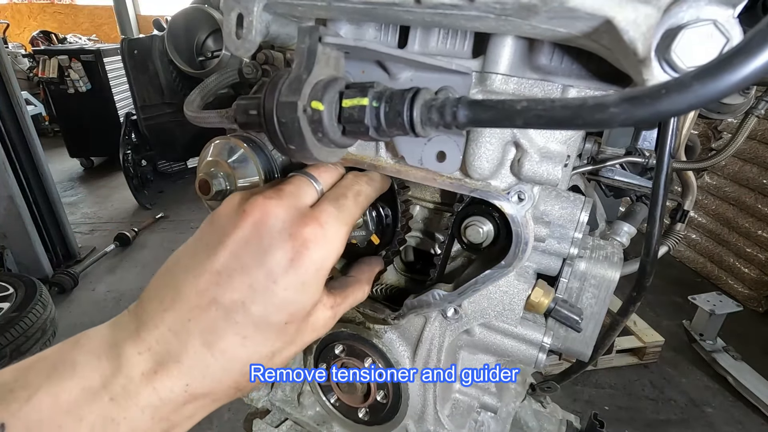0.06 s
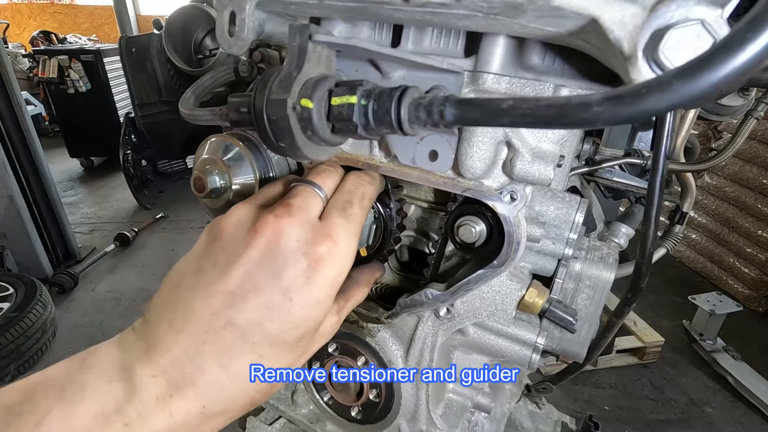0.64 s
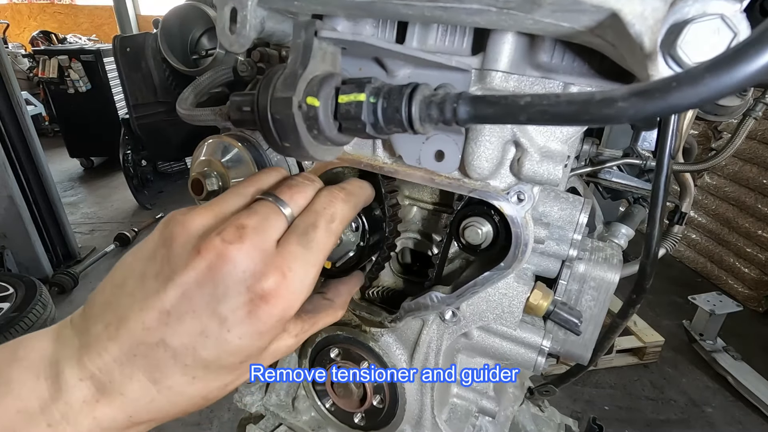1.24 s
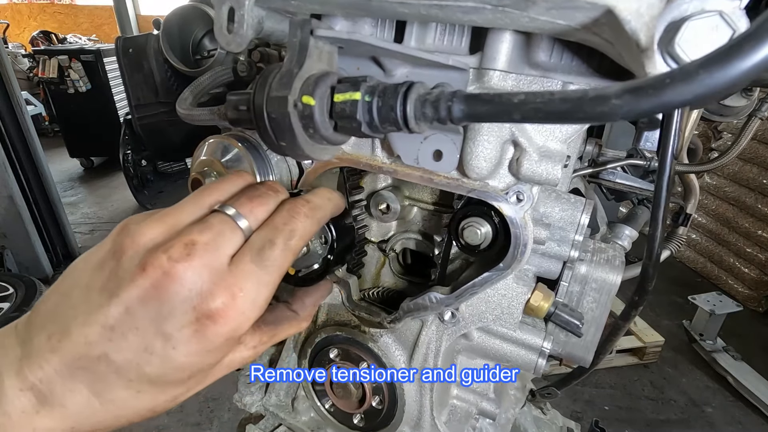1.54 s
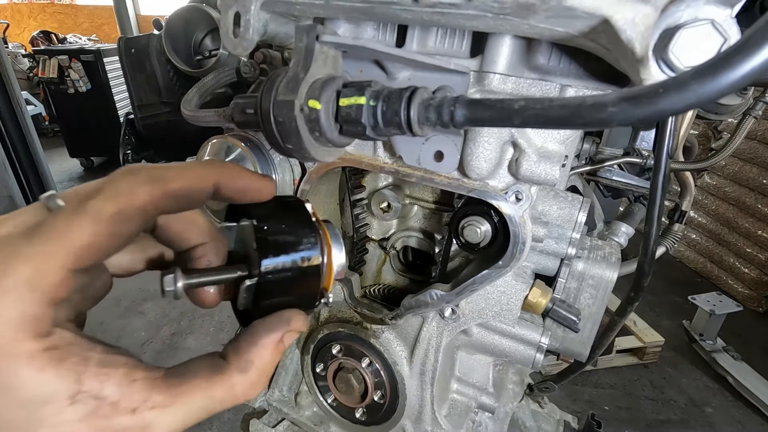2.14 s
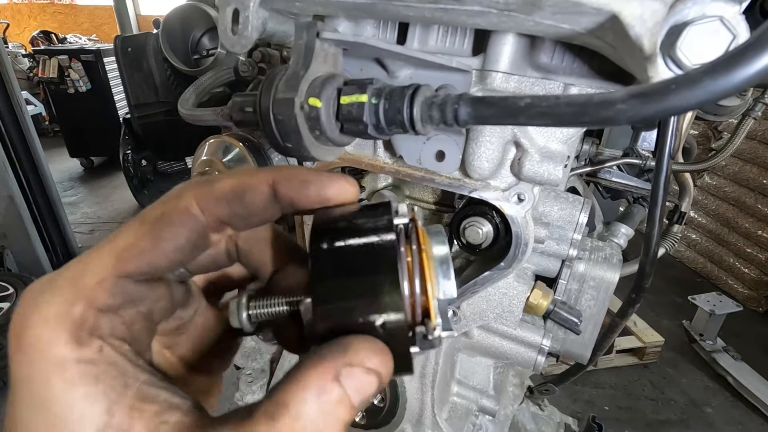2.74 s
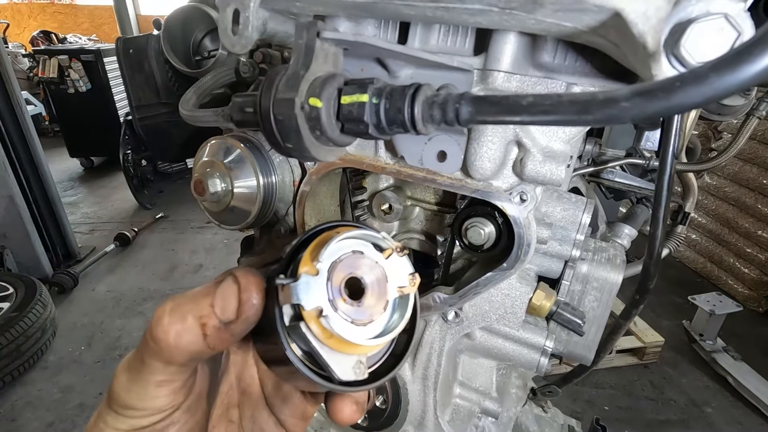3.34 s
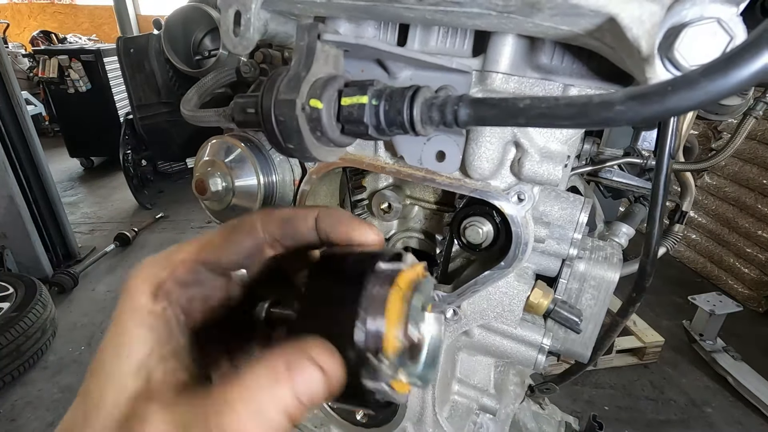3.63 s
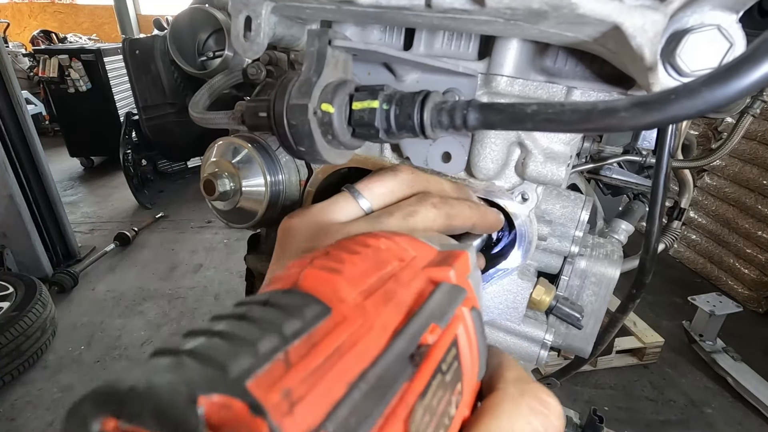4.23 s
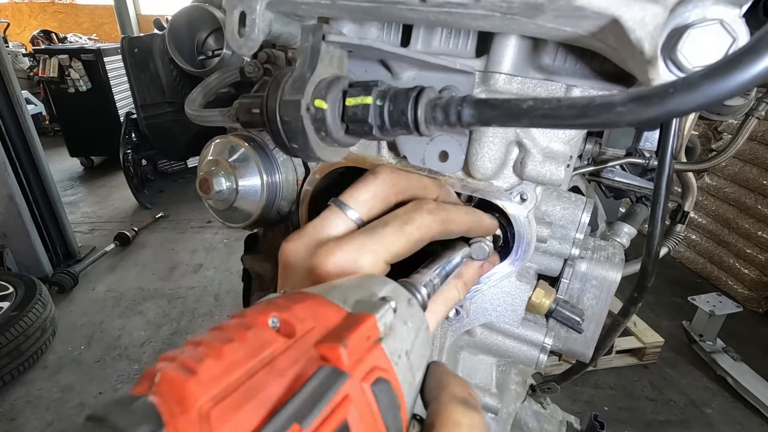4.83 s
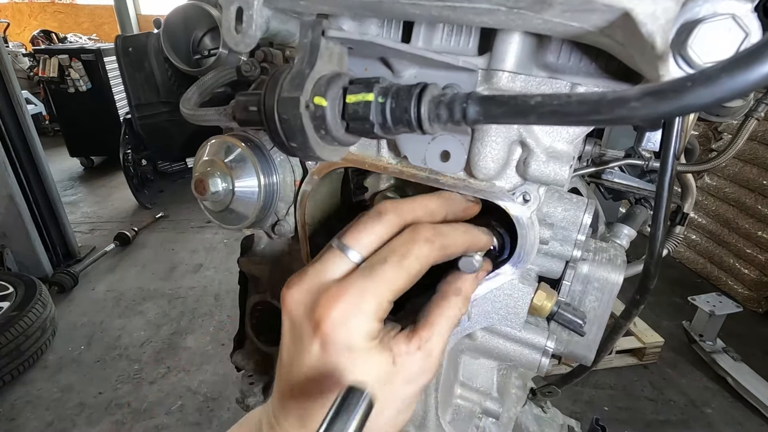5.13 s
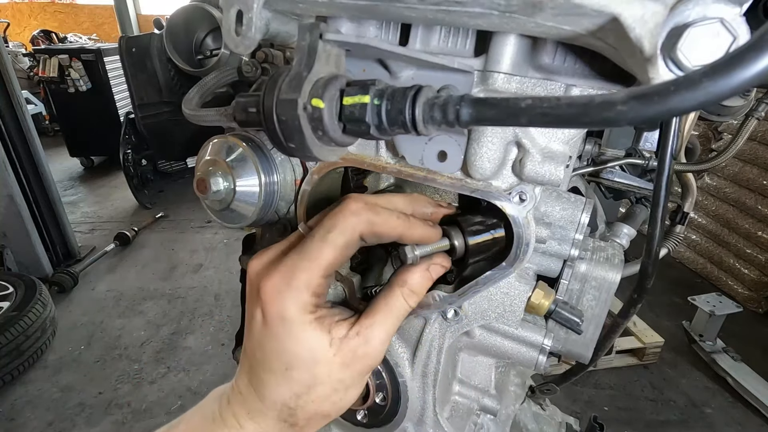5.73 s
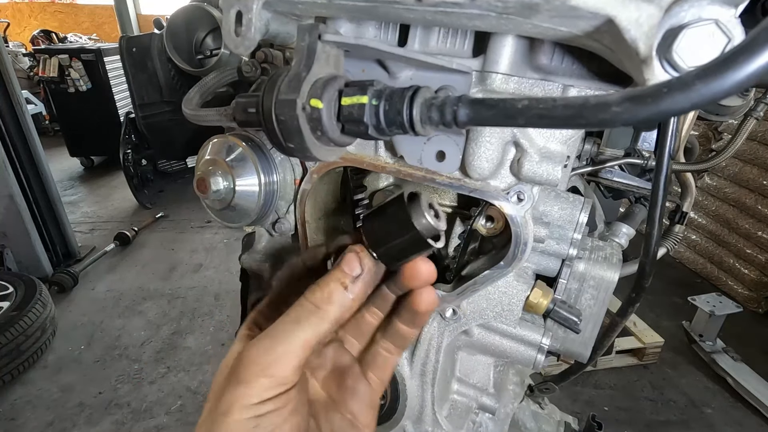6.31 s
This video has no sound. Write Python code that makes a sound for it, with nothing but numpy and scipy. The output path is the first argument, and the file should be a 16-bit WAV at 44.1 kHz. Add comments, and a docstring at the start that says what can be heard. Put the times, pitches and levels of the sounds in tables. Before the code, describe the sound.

Close to an engine in a garage, a steel part is worked loose with scattered small knocks, ringing clinks and faint scrapes. A socket clacks onto a bolt, and a much louder cordless impact wrench hammers for a moment, spins with a gear whine, then brakes. A couple of faint clinks follow. A low rumble and soft workshop hiss lie behind it all.

```python
"""A garage, with a stereo pair of microphones close to an engine block.
A steel tensioner is worked out of the block with small knocks, clinks and scrapes. Then, a little to the
right, a cordless impact wrench hammers a bolt loose, spins it out with whining gears, and brakes.
Behind lie a low rumble and soft workshop noise; the recorder's gain control ducks under the wrench
and lets them back up slowly."""
import sys
import numpy as np
from scipy import signal
from scipy.fft import rfft, irfft
from scipy.io import wavfile
from scipy.ndimage import uniform_filter1d

SR = 44100
rng = np.random.default_rng(int(sys.argv[2]) if len(sys.argv) > 2 else 0)


def file_out(sig):
    """Save sig as 16-bit WAV at sys.argv[1]."""
    # one column per channel
    cols = np.atleast_2d(sig).T
    # limit, then scale
    lim = np.clip(cols, -1, 1)
    pcm = np.round(lim * 32767).astype(np.int16)
    wavfile.write(sys.argv[1], SR, pcm)


N = 285327
TIME = np.arange(N) / SR

# Levels are relative, ahead of the mix and the gain control; spectra are per Hz.
# spectra of the rumble, the workshop noise, the hiss and a clatter further off: f/Hz, level/dB
RUMBLE_SPECTRUM = [(20, 3), (45, -0.5), (80, -6), (120, -12), (210, -14.5), (300, -23), (430, -35.5),
                   (2000, -100)]
SHOP_SPECTRUM = [(200, -10), (420, 4.5), (800, -3.5), (1200, 0.5), (2000, -8), (3200, -20.5), (12000, -66)]
HISS_SPECTRUM = [(800, -17), (2200, 1), (5200, 2), (7500, -8.5), (9500, -16), (13000, -22), (15500, -47.5)]
CLATTER_SPECTRUM = [(330, -20), (440, -4.5), (560, -15), (1000, -15), (1500, -24.5), (12000, -58)]
# slow drift of the first three: t/s, level/dB
RUMBLE_LEVEL = [(0, -41), (.6, -35.5), (1.5, -40.5), (6.47, -39)]
SHOP_LEVEL = [(0, -62.5), (1, -66.5), (3.5, -64), (6.47, -58.5)]
HISS_LEVEL = [(0, -72.5), (.8, -72.5), (2.6, -64.5), (3.5, -68.5), (6.47, -68.5)]
# steel knocking on steel, close up: t/s, part, peak level/dB, brightness/(dB per octave), main note/Hz
KNOCKS = [(0.046, "bolt", -44, 7, 7140), (0.41, "block", -22, -2.5, 633), (0.508, "bolt", -35, 2.5, 2900),
          (0.54, "bolt", -35, 5.5, 3700), (0.554, "block", -34, -8, 620), (0.581, "block", -37, -10, 617),
          (0.674, "block", -41, -26, 537), (0.845, "bolt", -46, -3.5, 7550),
          (0.881, "bolt", -42, -2.5, 3900), (0.897, "bolt", -40.5, -2.5, 2680),
          (1.227, "tensioner", -17, -2, 2247), (1.456, "plunger", -37.5, 0.5, 1870),
          (1.471, "block", -33.5, 0, 656), (1.54, "bolt", -29, -8, 1610), (1.554, "bolt", -41, -11, 1600),
          (1.609, "block", -24, -5, 1497), (1.795, "block", -35.5, -6, 1560),
          (2.079, "plunger", -36, 2, 5340), (2.098, "plunger", -23, 1, 4400),
          (2.116, "plunger", -29.5, 4, 2300), (2.268, "block", -33.5, -8, 665),
          (2.917, "block", -33, -0.5, 592), (3.719, "socket", -31.5, -3, 876),
          (3.826, "socket", -36, 0, 1510), (3.843, "socket", -29.5, -3, 1430),
          (3.861, "socket", -15.5, 2, 559), (3.873, "block", -29.5, -8.5, 558),
          (3.914, "socket", -29, -19, 1601), (5.619, "bolt", -35, 0, 2290),
          (6.326, "block", -41, -5.5, 606)]
# how each part rings: ring level/dB, t60/s, hollow body/dB, modes as (f/Hz, level/dB)
STEEL_PARTS = { "block": (-15, .1, -1, [(600, 1), (1090, 0), (1480, 4), (1760, 4), (6200, 0)]),
               "bolt": (-16, 0.24, -4, [(2720, 0), (3700, -11), (7100, 2), (7600, -4.5)]),
               "tensioner": (-10.5, 0.2, -1, [(802, 3), (1001, 5.5), (2230, 0), (3240, 2), (4310, 9),
               (4470, -9), (5529, -3), (7700, -5), (9300, 2)]), "plunger": (-12.5, .35, -28, [(2003, -5),
               (3074, -17), (3752, -14), (4301, -8), (4770, -14), (6900, -1.5), (9265, -4.5)]),
               "socket": (-17, 0.057, 0, [(560, 2.5), (4250, 1.5), (8150, 0.5), (9400, 3), (10100, 6)]), }
# spectrum of a steel contact: f/Hz, level/dB
CONTACT_SPECTRUM = [(100, -17), (370, -1.5), (600, 2), (1600, -4), (3700, -3), (8000, -12.5), (15500, -31)]
# parts sliding: t/s, length/s, level/dB, squeak/Hz
SCRAPES = [(0.262, 0.11, -55, 4570), (1.211, 0.016, -43, 2270), (2.068, 0.037, -46.5, 5500),
           (2.905, .17, -57.5, 2830), (3.721, 0.11, -53, 2192), (3.87, 0.077, -45.5, 2432),
           (6.15, 0.092, -60.5, 4870)]
# tones of rotor and fan, gear mesh with sidebands, and braking motor: multiple of shaft speed, level/dB
ROTOR_TONES = [(1, -50), (4, -38), (8, -45), (13, -28), (16, -40.5), (26, -50)]
GEAR_TONES = [(5.885, -41), (6.02, -39.5), (6.262, -33), (12.165, -35.5), (12.53, -35), (12.88, -45),
              (18.05, -42)]
BRAKE_TONES = [(4, -1.5), (8, -5), (20, -15.5)]
# spectra of the wrench's gear case and anvil: f/Hz, level/dB
CASE_SPECTRUM = [(100, -14), (450, -14), (800, -10.5), (1000, -6.5), (1600, -1), (2250, -0.5), (2950, -3.5),
                 (3400, -1), (3750, -6), (5000, -8.5), (6100, -6), (7500, -11.5), (10700, -15),
                 (13500, -22.5), (14800, -46.5)]
ANVIL_SPECTRUM = [(88, -35.5), (150, 5.5), (229, -5), (425, -14), (1670, -4.5), (3820, -7.5), (4210, -6.5),
                  (8750, -18.5), (11000, -13.5), (12900, -25), (15000, -48.5)]
# the socket clacks on, then the hammer strikes: t/s, crack level/dB, thump level/dB, crack length/s
BLOWS = [(4.0174, -7, -40, .001), (4.0495, -6, -22, .002), (4.055, 1, -19, .0012), (4.0608, -1, -13, .0012),
         (4.0942, -4, -22, .002), (4.0968, -3, -14, .002), (4.1142, -4, -22, .002),
         (4.1172, -3, -18, .0014), (4.1342, -2, -13, .003), (4.152, -3.5, -13, .003),
         (4.1712, -4, -19, .002)]
# the garage's reverberation: f/Hz, t60/s
GARAGE_T60 = [(150, 0.87), (700, 0.66), (1800, 0.68), (4600, 0.65), (8000, .45), (14000, 0.023)]

# one run of the wrench: trigger pulled, bolt comes loose, brake bites, rattle dies
START_S, LOOSE_S, BRAKE_S, STOP_S = 4.0, 4.17, 4.764, 4.842
FULL_SPEED_HZ = 335


def amp(db):
    """Decibels to gain."""
    return 10 ** (np.asarray(db) / 20)


def unit(x):
    """Scales to rms 1."""
    return x / np.sqrt(np.mean(x ** 2) + 1e-20)


def read(points, hz):
    """Reads rows of (f/Hz, value) on a log-frequency axis."""
    f, value = np.transpose(points)
    return np.interp(np.log(hz + 1), np.log(f + 1), value)


def curve(rows):
    """Joins rows of (t/s, value) by straight lines."""
    return np.interp(TIME, *np.transpose(rows))


def envelope(start, attack, end, release):
    """Rises in a straight line, holds until end, then dies away; all in seconds."""
    return np.clip((TIME - start) / attack, 0, 1) * np.exp(-np.maximum(TIME - end, 0) / release)


def add(mix, s, sound):
    """Mixes a sound in at time s."""
    span = mix[max(round(s * SR), 0):][:len(sound)]
    span += sound[:len(span)]


def colour(x, spectrum, size=4096):
    """Causal filter through rows of (f/Hz, level/dB)."""
    log_gain = np.log(amp(read(spectrum, abs(np.fft.fftfreq(size, 1 / SR)))))
    taps = np.fft.ifft(np.exp(np.conj(signal.hilbert(log_gain)))).real
    return signal.fftconvolve(x, taps[:size // 2])[:len(x)]


def burst(t, spectrum):
    """Coloured noise of rms 1, as long as t."""
    return unit(colour(rng.standard_normal(len(t)), spectrum))


def resonance(x, hz, q=5, gain_db=3):
    """Lifts a band around hz by adding a band-passed copy at gain_db."""
    return x + amp(gain_db) * signal.lfilter(*signal.iirpeak(hz, q, fs=SR), x)


def wander(hz):
    """Slow random motion of rms 1, up to about hz."""
    f = np.fft.rfftfreq(N, 1 / SR)
    return unit(irfft(rfft(rng.standard_normal(N)) / (1 + (f / hz) ** 4), N))


def air(spectrum, level_db, likeness):
    """Noise of one colour on a level curve; likeness 1 is the same at both microphones."""
    left, other = rfft(rng.standard_normal((2, N)))
    right = likeness * left + np.sqrt(1 - likeness ** 2) * other
    pair = np.array([left, right]) * amp(read(spectrum, np.fft.rfftfreq(N, 1 / SR)))
    return unit(irfft(pair, N)) * amp(level_db)


def workshop():
    """Low rumble, dull workshop noise, soft hiss and, at the start, a clatter dying away further off."""
    rumble = air(RUMBLE_SPECTRUM, curve(RUMBLE_LEVEL), likeness=1)
    shop = air(SHOP_SPECTRUM, curve(SHOP_LEVEL), likeness=.8)
    hiss = air(HISS_SPECTRUM, curve(HISS_LEVEL), likeness=.8)
    clatter = air(CLATTER_SPECTRUM, -43 - 85 * TIME, likeness=1)
    return rumble + shop + hiss + clatter


def contact_colour(brightness, hollow_db):
    """Hard contacts brighten the treble of a knock, heavy ones fill its bass."""
    hz, db = np.transpose(CONTACT_SPECTRUM)
    octaves = np.clip(np.log2(hz / 1600), 0, 2.3)
    return np.transpose([hz, db + brightness * octaves + hollow_db * (hz < 1000)])


def knocks(lead_s=.012, graze_s=.0025, contact_s=.0042, shudder_s=.08):
    """Parts graze and meet: a gritty contact, a shudder of the casting, and the struck part's ring."""
    t, out = np.arange(round(.4 * SR)) / SR - lead_s, np.zeros(N)
    after = np.maximum(t, 0)
    for s, part, peak_db, brightness, main_hz in KNOCKS:
        ring_db, t60, hollow_db, modes = STEEL_PARTS[part]
        grit, body = rng.standard_normal((2, len(t)))
        touch = grit * np.exp(np.minimum((t - .002) / graze_s, (.002 - t) / contact_s))
        shudder = amp(-20) * body * (t > 0) * np.exp(-after / shudder_s)
        blow, ring = resonance(touch + shudder, main_hz), 0
        for hz, db in modes:
            blow = resonance(blow, hz, q=16, gain_db=db)
            cluster_hz = hz * rng.normal(1, .018, (4, 1))  # a part's loose pieces split each mode
            ring += amp(db - 60 * after / t60) * np.sin(2 * np.pi * cluster_hz * after).sum(axis=0)
        note_t60 = .24 / (main_hz / 1000) ** .3  # low notes ring longer
        note = np.sin(2 * np.pi * main_hz * after) * amp(-60 * after / note_t60)
        ringing = amp(ring_db) * (unit(ring) + amp(-7) * unit(note))
        knock = colour(unit(blow) + ringing, contact_colour(brightness, hollow_db))
        peak_rms = np.sqrt(uniform_filter1d(knock ** 2, size=130).max())
        add(out, s - lead_s, amp(peak_db - 8) * knock / peak_rms)
    return out


def scrapes():
    """Oily steel slides with a thin, grainy squeak."""
    out = np.zeros(N)
    for s, length, db, hz in SCRAPES:
        count = round(length * SR)
        grains = rng.standard_normal(count) * rng.exponential(1, count)
        squeak = [(1800, -3), (hz * .85, -9), (hz, 3), (hz * 1.15, -9), (8000, -17), (15000, -36)]
        add(out, s, amp(db) * unit(colour(grains, squeak)) * signal.windows.hann(count) ** .5)
    return out


def trigger(jolt_s=.0055, whistle_hz=7980, fall_hz_per_s=5500):
    """The first current jolts the rotor; the speed controller whistles until the motor picks up."""
    t, out = np.arange(round(.06 * SR)) / SR, np.zeros(N)
    jolt = burst(t, [(600, -30), (1800, -11), (2700, 4), (3500, -7), (8500, -11), (14000, -45)])
    add(out, START_S, amp(-18) * jolt / (1 + (t / jolt_s) ** 8))
    whistle = np.sqrt(2) * np.sin(2 * np.pi * np.cumsum(whistle_hz - fall_hz_per_s * t) / SR)
    fade = np.exp(-t / .045) * signal.windows.tukey(len(t), .1)
    add(out, START_S + .0028, amp(-27) * whistle * fade)
    return out


def shaft_speed(loaded_hz=240, spin_up_s=.035, drag_hz=8, unscrew_s=.37, sag_hz=25, brake_hz_per_s=2450):
    """Turns a second: up against the tight bolt, on to full speed once it gives, then eased and braked."""
    driven, free, braked = (np.maximum(TIME - s, 0) for s in (START_S, LOOSE_S, BRAKE_S))
    loaded = loaded_hz * (1 - np.exp(-driven / spin_up_s))
    freed = (FULL_SPEED_HZ - drag_hz - loaded_hz) * (1 - np.exp(-free / spin_up_s))
    unscrewed = drag_hz * np.minimum(free / unscrew_s, 1)  # the thread drags until it is out
    eased = sag_hz * np.clip(1 + (TIME - BRAKE_S) / .07, 0, 1) ** 3  # the trigger is let up
    return np.maximum(loaded + freed + unscrewed - eased - brake_hz_per_s * braked, 0)


def shaft_tones(rows, turns, slip, flutter, flutter_hz):
    """Multiples of the shaft speed, each unsteady in phase (slip/rad) and strength (flutter)."""
    out = np.zeros(N)
    for multiple, db in rows:
        strength = amp(db) * (1 + flutter * wander(flutter_hz))
        out += strength * np.cos(2 * np.pi * multiple * turns + slip * wander(flutter_hz))
    return np.sqrt(2) * out


def gear_case(x, ring_db=-5, decay_s=.0091):
    """The gear case adds a dense cluster of short resonances."""
    t = TIME[:2048]
    ring = unit(rng.standard_normal(len(t)) * np.exp(-t / decay_s)) / np.sqrt(len(t))
    return x + amp(ring_db) * signal.fftconvolve(x, ring)[:N]


def gear_rattle(turns, swell_s=.11, settle_db_per_s=5):
    """Loose teeth chatter once a turn and in bursts; more as the socket grinds on and as it spins free."""
    chatter = (1 + .35 * np.cos(2 * np.pi * turns)) * amp(1.9 * wander(430))
    rattle = unit(colour(gear_case(chatter * rng.standard_normal(N)), CASE_SPECTRUM))
    grinding = amp(-27) * envelope(START_S, .025, START_S + .05, .028)
    spin_s = LOOSE_S + .079
    spin_db = -30.5 - settle_db_per_s * (TIME - spin_s - swell_s)
    spinning = amp(spin_db) * envelope(spin_s, swell_s, BRAKE_S, .035)
    return rattle * (amp(-31) + grinding + spinning) * envelope(START_S, .014, STOP_S, .0063)


def motor():
    """Rotor, fan and planet gears follow one shaft and whine near full speed; the brake sings it down."""
    speed = shaft_speed() * (1 + .0008 * wander(25))
    turns, share = np.cumsum(speed) / SR, speed / FULL_SPEED_HZ
    rotor = share ** 8 * shaft_tones(ROTOR_TONES, turns, slip=.22, flutter=.15, flutter_hz=70)
    gears = share ** 13 * shaft_tones(GEAR_TONES, turns, slip=.7, flutter=.35, flutter_hz=50)
    whine = (rotor + amp(-1) * gears) * envelope(LOOSE_S, .17, BRAKE_S, .015)
    rattle = gear_rattle(turns)
    brake = shaft_tones(BRAKE_TONES, turns, slip=.35, flutter=.3, flutter_hz=130)
    braking = amp(-23) * envelope(BRAKE_S, .0039, BRAKE_S + .023, .018)
    return whine + rattle + braking * resonance(brake, hz=2200, gain_db=0)


def socket_grind(skids_per_s=900, seated_s=4.054):
    """The turning socket skids over the corners of the bolt head, ever harder until it drops on."""
    skids = (rng.random(N) < skids_per_s / SR) * rng.standard_normal(N)
    grit = unit(colour(gear_case(skids), [(600, 2.5), (2500, 5), (4000, -8), (14000, -32)]))
    return amp(-23) * grit * envelope(START_S + .012, .035, seated_s, .003)


def hammer(ring_s=.03, thump_hz=80, thump_s=.0054, shake_s=.016):
    """Each blow cracks on the anvil, shoves the engine with a low thump, and shakes each microphone."""
    t, cracks, thumps = np.arange(round(.08 * SR)) / SR, np.zeros(N), np.zeros((2, N))
    for s, crack_db, thump_db, length in BLOWS:
        shape = 1 / (1 + (t / length) ** 4) + amp(-26) * np.exp(-t / ring_s)
        add(cracks, s, amp(crack_db - 10) * burst(t, ANVIL_SPECTRUM) * shape)
        push = rng.choice([-1, 1]) * np.sin(2 * np.pi * thump_hz * t) * np.exp(-t / thump_s)
        for microphone, shake_db in zip(thumps, (-13, -7)):
            shake = burst(t, [(30, 5), (230, 1.5), (700, -23), (2500, -63)]) * np.exp(-t / shake_s)
            add(microphone, s + .002, amp(thump_db) * (push + amp(shake_db) * shake))
    return cracks, thumps * amp([[0], [1.5]])  # heavier on the right


def garage(x, near_db, tail_db):
    """At the microphones: direct sound, quick reflections off the engine, and the garage's tail."""
    hz, frame_s, bands = signal.stft(rng.standard_normal((2, SR)), SR, nperseg=256)
    decay = amp(-60 * frame_s / read(GARAGE_T60, hz)[:, None])
    t = TIME[:SR]
    tail = signal.istft(bands * decay, SR, nperseg=256)[1][:, :SR] * (1 - np.exp(-t / .00099))
    near = rng.standard_normal((2, SR)) * (rng.random((2, SR)) < .03) * np.exp(-t / .014) * (t > .001)
    near = signal.lfilter([1, -.7], [1], near)  # small metal faces throw back mostly treble
    echo = (amp(near_db) * unit(near) + amp(tail_db) * unit(tail)) / np.sqrt(SR)
    return x + signal.fftconvolve(x[None], echo, axes=1)[:, :N]


def from_right(x, delay_samples, widen_hz=13800):
    """Sound reaches the left microphone slightly late; an extra phase lag there widens the top treble."""
    hz = np.fft.rfftfreq(N, 1 / SR)
    lag = 2 * np.pi * hz * delay_samples / SR + (hz / widen_hz) ** 6
    return np.array([irfft(rfft(x[0]) * np.exp(-1j * lag), N), x[1]])


def scene():
    """Loose parts and the far louder wrench close to the microphones, the workshop behind."""
    cracks, thumps = hammer()
    strikes = garage(cracks + trigger() + socket_grind(), near_db=-14, tail_db=-18)
    running = garage(motor(), near_db=-12.5, tail_db=-16.5)
    wrench = from_right(running + strikes, delay_samples=.4) + thumps
    parts = from_right(garage(knocks() + scrapes(), near_db=-15, tail_db=-17.5), delay_samples=.15)
    return amp(16) * wrench + parts + workshop()


def record(dry, threshold_db=-22, deepest_cut_db=14, recover_db_per_s=8.5, ceiling=.9, edge_hz=15700):
    """The recorder's gain control ducks at once and recovers slowly; then clipping and the band edge."""
    power_db = 10 * np.log10(abs(uniform_filter1d((dry ** 2).mean(0), size=200)) + 1e-12)
    excess_db = np.clip(power_db - threshold_db, 0, deepest_cut_db)
    recovery_db = recover_db_per_s * TIME
    cut_db = np.maximum.accumulate(excess_db + recovery_db) - recovery_db
    clipped = np.clip(dry * amp(-cut_db), -ceiling, ceiling)
    lowpass = signal.firwin(511, edge_hz, window=("kaiser", 9), fs=SR)
    return signal.oaconvolve(clipped, lowpass[None], "same")


dry = scene()
out = record(dry)
file_out(out)
```